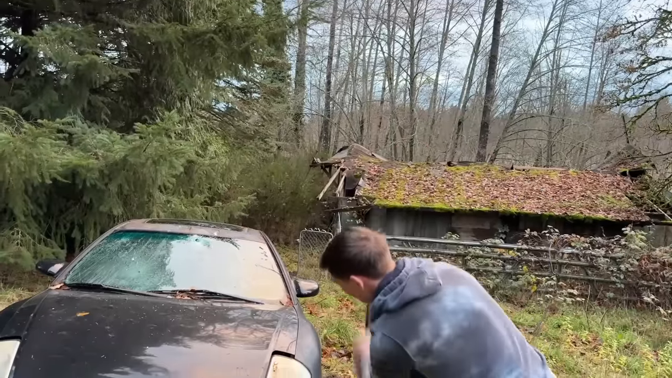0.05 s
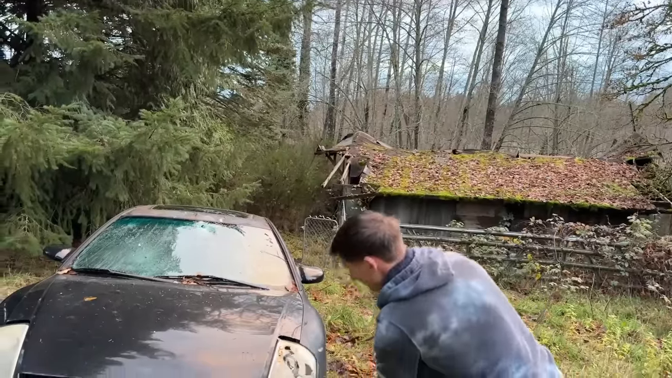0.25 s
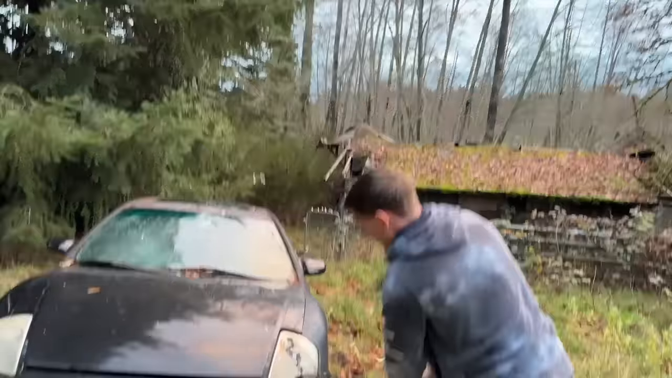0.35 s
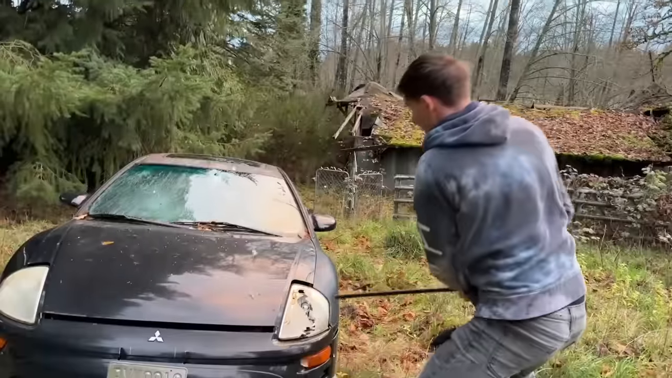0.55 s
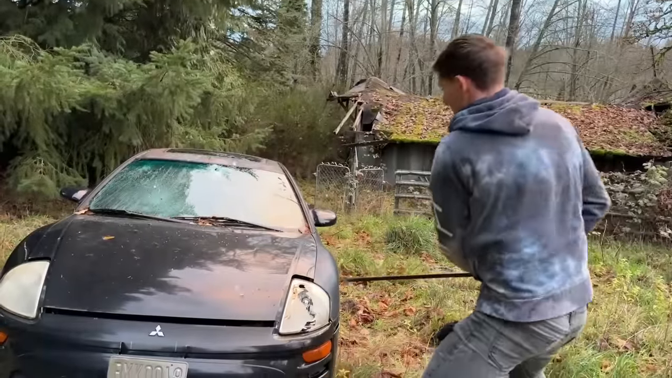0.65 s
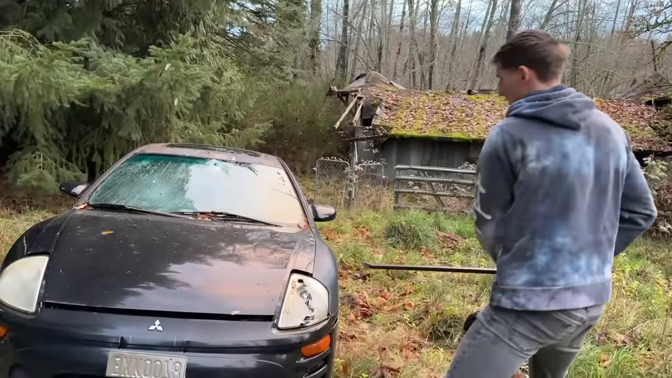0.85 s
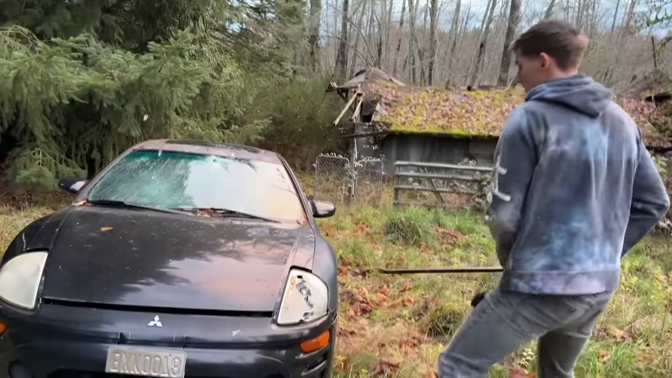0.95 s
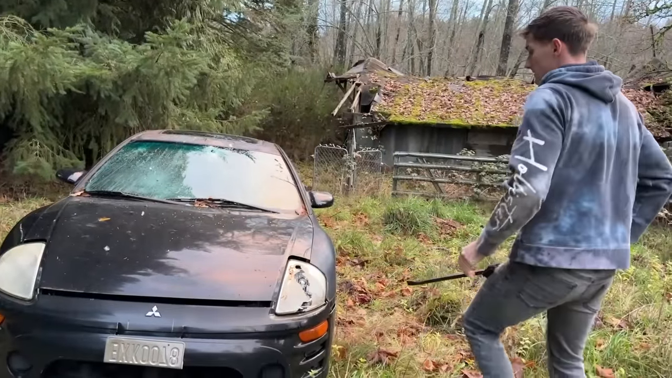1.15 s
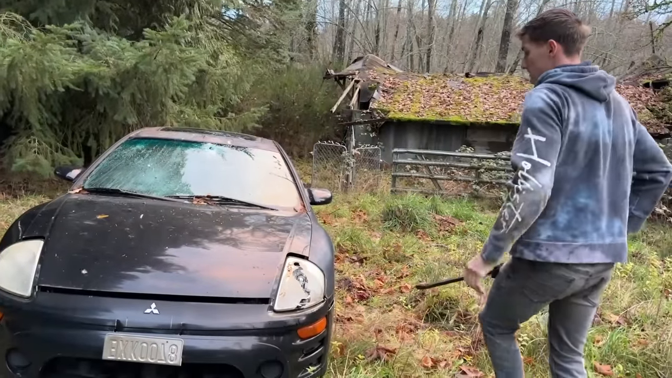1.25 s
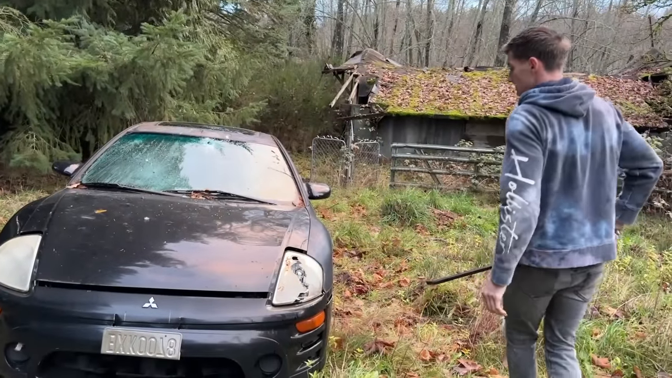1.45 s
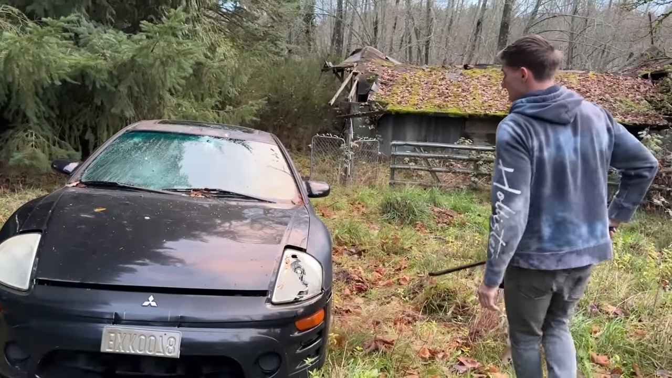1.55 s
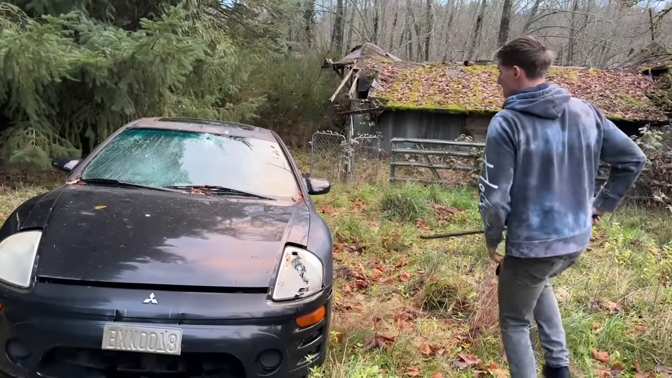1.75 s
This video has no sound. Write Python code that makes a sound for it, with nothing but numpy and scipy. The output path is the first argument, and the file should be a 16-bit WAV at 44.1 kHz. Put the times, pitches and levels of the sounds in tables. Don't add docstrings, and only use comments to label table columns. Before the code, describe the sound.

After a brief low gust and cloth swish, a metal bar whacks car glass very loudly, overloading the phone microphone; splinters patter down, then quieter leaf and twig steps follow in a hushed woodland clearing.

```python
import sys
import numpy as np
from scipy import signal
from scipy.fft import rfft, irfft
from scipy.io import wavfile
from scipy.ndimage import uniform_filter1d

SR = 44100
rng = np.random.default_rng(int(sys.argv[2]) if len(sys.argv) > 2 else 0)


def master_out(mix):
    frames = np.transpose(np.atleast_2d(mix))
    ceiling = np.clip(frames, -1, 1)
    pcm = np.round(ceiling * 32767).astype(np.int16)
    wavfile.write(sys.argv[1], SR, pcm)


def gain_from_db(level_db):
    decades = np.asarray(level_db, float) / 20
    return 10 ** decades


N = 79380
T = np.arange(N) / SR
BLOW_S = 0.1434
CRUSH_RISE_S, CRUSH_HOLD_S, CRUSH_T60_S = 0.0078, 0.0054, 0.11

# frequency in Hz, level in dB.
WOODS_COLOUR = [(24, -32.5), (60, 2), (199, -2), (1100, -1.5), (2100, -21.5), (4560, -19.5), (6820, -25.5),
                (11800, -31), (16000, -40)]
# time in seconds, level in dB.
GUST_LEVEL = [
    (0.0, -48.5),
    (0.17, -47),
    (0.34, -67),
    (0.446, -65),
    (0.566, -76),
    (1.3, -82),
    (1.45, -70),
    (1.8, -70),
]
# delay in seconds, rise in seconds, T60 in seconds, level in dB.
ECHOES = [
    (.025, 0.025, 0.4, -21),
    (.165, 0.036, 0.22, -38),
    (.2, .08, .85, -47),
]
# frequency in Hz, level in dB per Hz.
NEAR_COLOUR = [(35, -43), (60, -17), (398, -3.5), (766, -5.5), (841, -11), (1280, -10.5), (1700, -17.5),
               (3670, -10.5), (16000, -30.5)]
# frequency in Hz, level in dB per Hz.
FAR_COLOUR = [(59, -52), (100, -30.5), (289, -10), (350, -1.5), (502, -16.5), (751, -8), (1760, -21.5),
              (5190, -15.5), (16000, -34)]
# frequency in Hz, level in dB per Hz.
SLEEVE_COLOUR = [(180, -34), (300, -4), (692, -15.5), (800, -11.5), (1360, -21), (14000, -33.5)]
# half length in seconds, level in dB.
RUSTLES = [
    (0.0087, -68.5),
    (0.015, -72.5),
    (0.044, -70.5),
    (0.042, -73),
    (.012, -76.5),
    (0.06, -68.5),
]
RUSTLE_S = [.75, .86, .94, 1.28, 1.54, 1.61]
# frequency in Hz, level in dB per Hz.
CLOTH_COLOUR = [(1470, -50), (2500, -27.5), (3160, 5), (3460, 1), (6960, 5), (16000, -5.5)]
# start in seconds,
# crackle peak in dB, weight below 1.5 kHz in dB, T60 in seconds.
STEPS = [(0.096, -51, -54, 0.046), (0.539, -60.5, -55, 0.079), (.61, -66.5, -61, 0.063),
         (.978, -65, -66, 0.057), (0.984, -61, -87.5, 0.041), (1.1092, -37.5, -45.5, 0.085),
         (1.1692, -47, -52.5, 0.1), (1.293, -58, -62.5, 0.05), (1.3, -60.5, -70.5, 0.056),
         (1.3199, -50.5, -56.5, 0.099), (1.476, -62.5, -66, 0.12), (1.648, -60, -73, .008),
         (1.705, -64, -59.5, 0.009), (1.7086, -60.5, -67, 0.0098)]
# frequency in Hz, level in dB per Hz.
LEAF_COLOUR = [(710, -15), (1200, 1.5), (1400, -2.5), (2150, -11.5), (3220, -7), (5650, -2), (10500, -14),
               (16000, -34.5)]
# frequency in Hz, level in dB per Hz.
SOLE_COLOUR = [(59, -48), (100, -31.5), (302, -5.5), (411, -10), (650, -4), (898, -6.5), (2500, -22),
               (3250, -52.5), (5500, -120)]
# start in seconds, peak in dB, ring in Hz, T60 in seconds.
POPS = [(0.027, -37, 49, 0.037), (0.0592, -43, 120, 0.026), (0.0646, -33, 67, 0.021),
        (0.1007, -27.5, 554, 0.0079), (0.101, -47, 5000, 0.0049), (0.1079, -29, 80, 0.011),
        (.32, -40, 74, 0.059), (0.368, -46.5, 70, 0.032), (.978, -55, 421.4, 0.065),
        (1.1724, -41.5, 552, 0.044), (1.177, -44, 719, 0.089), (1.259, -52, 1810, 0.01),
        (1.2586, -53.5, 3700, 0.0077), (1.649, -57, 3600, .003), (1.7068, -42.5, 654, 0.0049),
        (1.7063, -55.5, 2600, .003), (1.7104, -41, 4690, 0.0027), (1.7117, -45, 5550, .005),
        (1.737, -50.5, 449.4, 0.012), (1.76, -53.5, 498, .012)]
# start in seconds, peak in dB, ring in Hz.
SNAPS = [(.1655, 0, 1190), (0.1702, 11, 2500), (.1711, -16, 2930), (.1758, -4.5, 785), (0.1772, -15, 1570),
         (1.1125, -34, 5480), (1.1159, -37, 3920), (1.175, -39, 4510), (1.162, -57, 3510),
         (1.259, -60, 2610), (1.303, -50.5, 5330), (1.477, -54, 6500), (1.6485, -54, 5000)]
# frequency
# in Hz, width in Hz, level in dB.
PANELS = [(345, 23, 0), (614, 20, 0.5), (745, 40, -6), (1170, 40, -6), (1450, 50, -13), (2060, 23, -8),
          (2470, 40, -13.5), (3550, 200, -7.5), (5250, 200, -8), (5600, 440, -6)]
# time in seconds, level in dB.
PANEL_LOAD = [
    (.14, -90),
    (.2, -37),
    (.29, -53),
    (.36, -37.5),
    (.41, -48),
    (.5, -57),
    (.6, -58),
    (.7, -72),
    (.85, -74),
]
# frequency in Hz, level in dB.
SHARDS = [(2400, 5.5), (4600, -15), (5500, -2), (6400, 0.5), (9000, -3), (14000, -21.5)]
# time in seconds, peak in dB, ring in Hz.
CRUMBS = [(.335, -50, 6620), (.355, -73, 5300), (.372, -46, 7550), (0.389, -42, 5400), (.405, -58, 13000),
          (.41, -60, 11350), (0.414, -49, 5060), (.43, -66, 9000), (.44, -52, 3530), (.468, -64, 3550),
          (.512, -64, 5350), (0.534, -60, 5500), (.549, -67, 9380), (.577, -71, 12200), (.61, -73, 7500),
          (.609, -69, 12600), (.62, -65.5, 5430), (0.648, -66, 5000), (0.478, -56, 5435), (.51, -64, 8700),
          (0.547, -54, 3300), (.575, -66, 5848), (0.621, -67, 9480), (0.644, -68.5, 11660),
          (.675, -81, 5110), (.72, -72.5, 6480), (.755, -66, 6485), (.81, -71, 5104), (0.809, -77, 7070)]
# frequency in Hz, level in dB per Hz.
PANE_COLOUR = [(40, -37), (270, -10.5), (1220, -5), (1800, -18), (2450, -1), (4600, -9), (6100, -6.5),
               (16000, -23)]
# frequency in Hz, width in Hz, level in dB.
PANE_RINGS = [(359, 40, -5.5), (750, 27, -4), (850, 120, -5.5), (1180, 45, 1), (1293, 56, 0.5),
              (2089, 28, 0), (2335, 45, 8), (2540, 76, 1.5), (2610, 70, -0.5), (3070, 27, 0.5),
              (4800, 90, -7.5), (5965, 60, -2), (6220, 25, -4.5), (6480, 65, -2.5)]
# frequency in Hz, level in dB, T60 in seconds.
BAR = [(205, -3.5, 0.4), (405, 1, 0.22), (1792, -5, 0.35), (522, -3, 0.25), (773, -4, .25),
       (1300, 1, 0.098), (2272, -3.5, 0.21), (3060, -3, 0.19), (3450, 0, 0.047), (3820, -3, 0.15),
       (3800, 2, .22), (3864, 6.5, 0.11), (6240, -3.5, .1), (6550, -3.5, 0.11)]


def unit(x):
    return x / np.sqrt(np.mean(x ** 2))


def colour(x, points, size=2048):
    hz, db = np.array(points, float).T
    bins_hz = np.arange(size // 2 + 1) * SR / size
    log_gain = np.interp(np.log(bins_hz + 1), np.log(hz), db) * np.log(10) / 20
    cep = irfft(log_gain)
    cep[1:size // 2] *= 2
    cep[size // 2 + 1:] = 0
    h = irfft(np.exp(rfft(cep)))
    return signal.fftconvolve(x, h / np.sqrt(np.sum(h ** 2)))[:N]


def shape(start, rise, hold, t60):
    age = T - start
    release = np.clip(age - rise - hold, 0, None) / max(t60, .003)
    return np.clip(age / max(rise, 1e-4), 0, 1) * gain_from_db(-60 * release)


def bump(middle, half):
    return np.exp(-((T - middle) / half) ** 2)


def ring(x, hz, t60):
    return signal.lfilter([1], [1, -np.exp(2j * np.pi * hz / SR - np.log(1000) / (t60 * SR))], x).imag


def width_t60(width_hz):
    return np.log(1000) / (np.pi * width_hz)


def grains(per_s, spread_db):
    chance, sign, size = rng.random((3, N))
    clicks = (chance < per_s / SR) * np.sign(sign - .5)
    return unit(clicks * gain_from_db(-spread_db * np.log(size + 1e-4)))


def walk(rate):
    k = int(SR / rate)
    steps = np.repeat(rng.standard_normal(N // k + 1), k)
    return 1.1 * uniform_filter1d(uniform_filter1d(steps, k), k)[:N]


def split(x, hz=5000):
    low = signal.sosfilt(signal.butter(1, hz, fs=SR, output="sos"), x)
    return low, x - low


def band_noise(low_hz, high_hz):
    sos = signal.butter(2, [low_hz, high_hz], "band", fs=SR, output="sos")
    return signal.sosfilt(sos, rng.standard_normal(N))


def woods():
    log_hz, level_db = np.log(np.array(WOODS_COLOUR)[:, 0]), np.array(WOODS_COLOUR)[:, 1]
    hush = 0
    for hz in 30 * 2 ** np.arange(0, 9.1, .5):
        db = np.interp(np.log(hz), log_hz, level_db) + 0.83 * walk(3.6)
        hush = hush + gain_from_db(db) * band_noise(hz / 1.2, hz * 1.2)
    return gain_from_db(-67.5) * unit(hush)


def gust():
    return unit(band_noise(22, 97)) * gain_from_db(np.interp(T, *np.array(GUST_LEVEL).T) + 3.0 * walk(30))


def clearing():
    out = 0
    for k, (late, rise, t60, db) in enumerate(ECHOES):
        low, high = split(colour(grains(14000, 1.5), FAR_COLOUR if k else NEAR_COLOUR))
        start = BLOW_S + late
        low = low * shape(start, rise, 0, t60) * gain_from_db(2.0 * walk(40))
        high = high * shape(start, rise, 0, t60 * 0.45) * gain_from_db(2.0 * walk(27))
        out = out + gain_from_db(db) * (low + high)
    return out


def sleeve():
    moving = gain_from_db(-59.5) * shape(0, 0, BLOW_S, .1) * gain_from_db(2.0 * walk(50))
    flap = gain_from_db(-58.5) * bump(0.0427, 0.01)
    return colour(grains(9000, 2.0) * moving, SLEEVE_COLOUR) + ring(grains(3030, 3.9) * flap, 3800, 0.0011)


def swish():
    rise_s, hold_s = 0.055, 0.012
    whistle = unit(ring(rng.standard_normal(N), 3200, width_t60(2000)))
    return gain_from_db(-61) * whistle * shape(BLOW_S - rise_s - hold_s, rise_s, hold_s, .01)


def rustles():
    brush = sum(gain_from_db(db) * bump(s, half) for s, (half, db) in zip(RUSTLE_S, RUSTLES)) * gain_from_db(2.0 * walk(60))
    return colour(grains(12000, 2.5) * brush, [(1500, -5)] + CLOTH_COLOUR[1:])


def treads(column, longer):
    rise_s = 0.004
    return sum(gain_from_db(step[column]) * shape(step[0], rise_s, step[3] * 0.084 * longer, step[3] * longer)
               for step in STEPS)


def boots():
    low, rest = split(colour(grains(7000, 3.3), [(600, -34)] + LEAF_COLOUR), hz=4500)
    high, top = split(rest, hz=9040)
    crackle = low * treads(1, 0.75) + high * treads(1, 0.41) + top * treads(1, 0.63)
    press = grains(9000, 1.5) * treads(2, 2.0)
    return crackle + colour(press, SOLE_COLOUR[:-2] + [(2200, -22), (8000, -44.0)])


def pops():
    return sum(-gain_from_db(db) * shape(s, 1 / hz / 4, 0, t60) * np.sin(2 * np.pi * hz * (T - s))
               for s, db, hz, t60 in POPS)


def snaps():
    cycles = 3.1
    out = 0
    for s, db, hz in SNAPS:
        decay = gain_from_db(-60 * np.clip(T - s, 0, 1) * hz / cycles)
        out = out + gain_from_db(db) * shape(s, 0, 0, 1) * decay * np.sin(2 * np.pi * hz * (T - s))
    return out


def panels():
    hum = sum(gain_from_db(db + 2.0 * walk(25)) * unit(ring(grains(3000, 2.0), hz, width_t60(width)))
              for hz, width, db in PANELS)
    return unit(hum) * gain_from_db(np.interp(T, *np.array(PANEL_LOAD).T))


def shower(count=28):
    hz, db = np.array(SHARDS, float).T
    sizes = hz[0] * (hz[-1] / hz[0]) ** ((np.arange(count) + rng.random(count)) / count)
    tinkle = 0
    for f in sizes:
        level_db = np.interp(np.log(f), np.log(hz), db) + 4 * walk(69.3)
        tinkle = tinkle + gain_from_db(level_db) * unit(ring(grains(400, 2.0), f, .012))
    return gain_from_db(-48.5) * unit(tinkle) * shape(0.27, 0.058, 0.034, 0.82)


def crumbs():
    patter = grains(6000, 2.0)
    skips = [gain_from_db(db) * patter * shape(s - .006, 0.0025, 0.0042, 0.031) for s, db, _ in CRUMBS]
    tinkle = sum(ring(x, hz, .011) for x, (_, _, hz) in zip(skips, CRUMBS))
    return gain_from_db(-13.5) * tinkle + gain_from_db(-5) * colour(sum(skips), LEAF_COLOUR)


def fractures():
    growth = 0.26 * (T > BLOW_S) + 1.2 * shape(BLOW_S, CRUSH_RISE_S, 9, 1)
    spread = growth * shape(BLOW_S, 0, CRUSH_RISE_S + CRUSH_HOLD_S, CRUSH_T60_S)
    low, high = split(grains(9000, 2) * spread)
    return low + high * 1.2 * shape(BLOW_S, 0, CRUSH_RISE_S + .008, .12)


def pane(cracks):
    rings = sum(gain_from_db(db) * np.sqrt(width) * ring(cracks, hz, width_t60(width)) for hz, width, db in PANE_RINGS)
    rings = rings * np.std(cracks) / np.std(rings)
    return gain_from_db(-5) * colour(cracks, PANE_COLOUR) + gain_from_db(-15.5) * rings


def steel_bar(cracks):
    modes = sum(gain_from_db(db) * ring(cracks, hz, t60) for hz, db, t60 in BAR)
    return gain_from_db(-42) * 10 * modes * np.std(cracks) / np.std(modes)


def cabin():
    start = BLOW_S + 0.0067
    return gain_from_db(-19) * 2 * shape(start, 0.014, 0, 0.075) * np.sin(2 * np.pi * 214 * (T - start))


def blow():
    cracks = fractures()
    return pane(cracks) + steel_bar(cracks) + cabin()


def scene():
    background = woods() + gust() + clearing()
    person = sleeve() + swish() + rustles() + boots() + pops()
    glass = snaps() + panels() + shower() + crumbs() + blow()
    return (background + person + glass)[None]


def top_cut(x):
    return signal.sosfilt(signal.butter(12, 16130, fs=SR, output="sos"), x)


def record(dry):
    clip = 0.88
    clipped = clip * np.tanh(dry / clip)
    mix = signal.sosfilt(signal.ellip(8, .2, 60, 15900, fs=SR, output="sos"), clipped)
    return top_cut(mix)


dry = scene()
out = record(dry)
master_out(out)
```